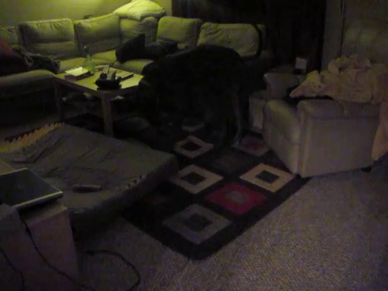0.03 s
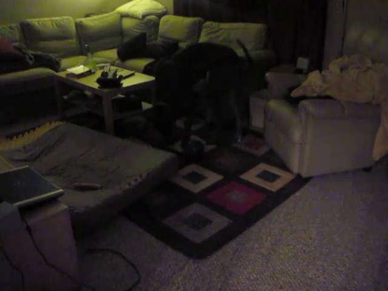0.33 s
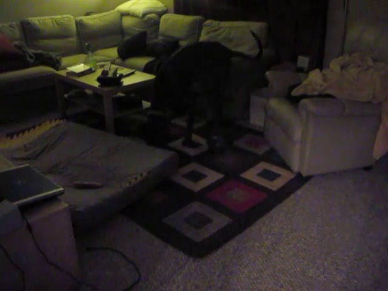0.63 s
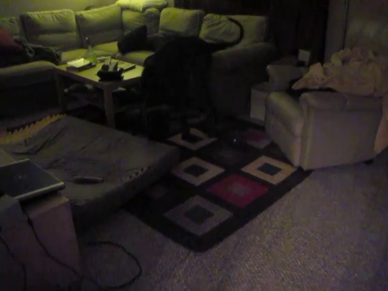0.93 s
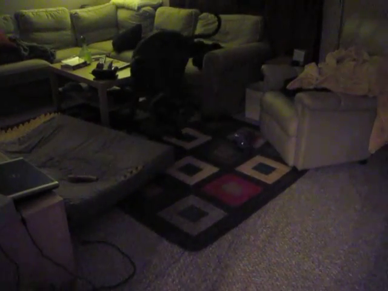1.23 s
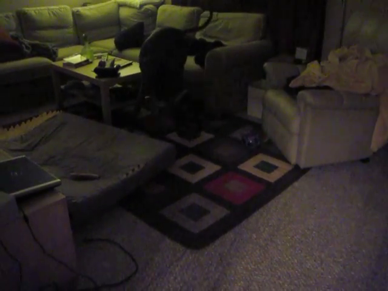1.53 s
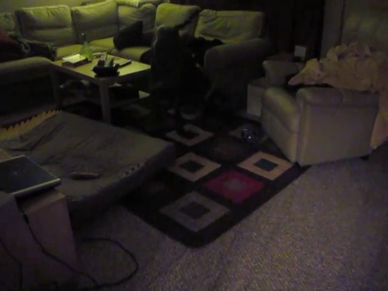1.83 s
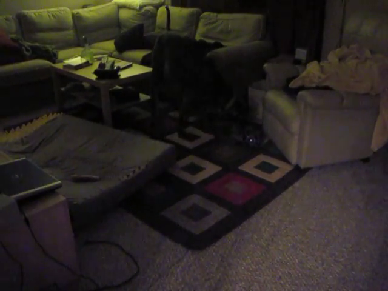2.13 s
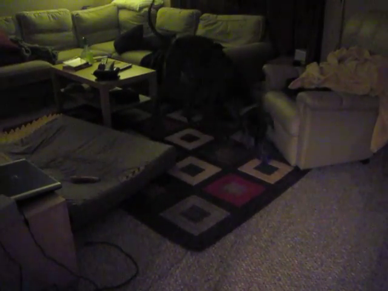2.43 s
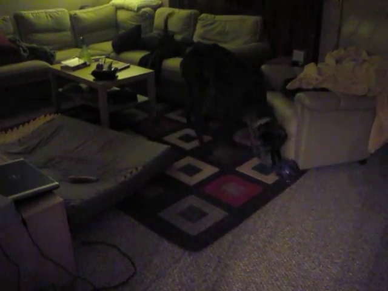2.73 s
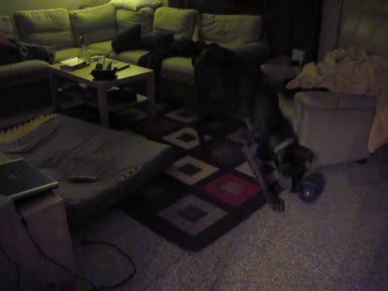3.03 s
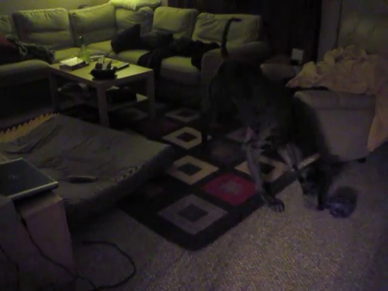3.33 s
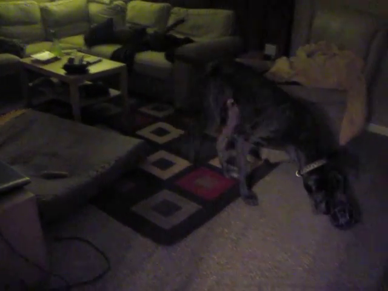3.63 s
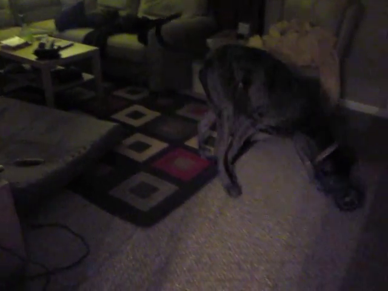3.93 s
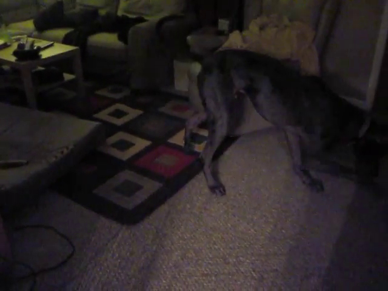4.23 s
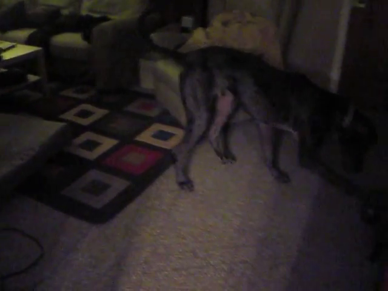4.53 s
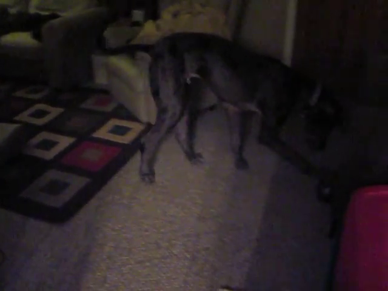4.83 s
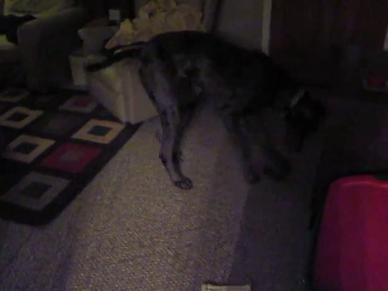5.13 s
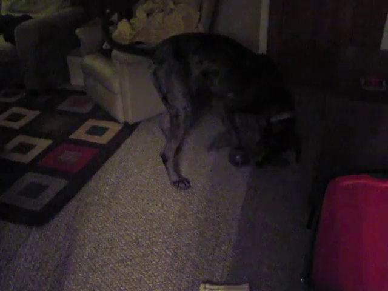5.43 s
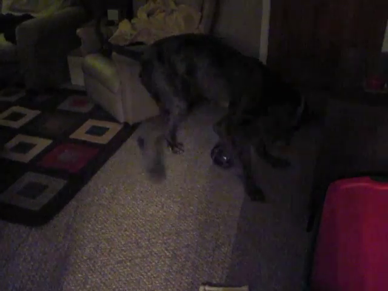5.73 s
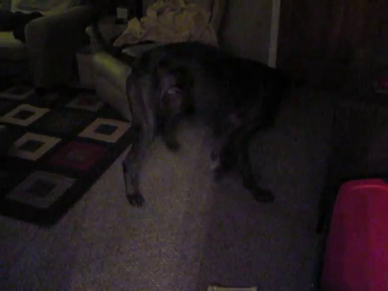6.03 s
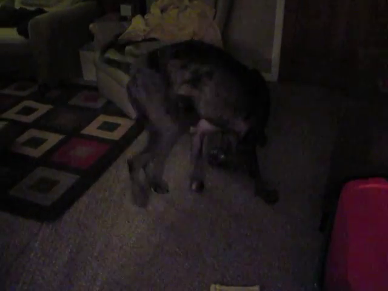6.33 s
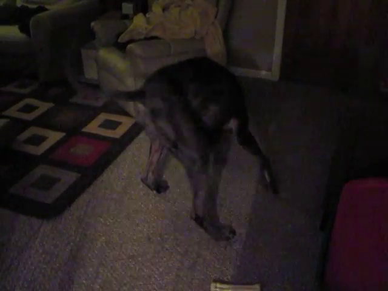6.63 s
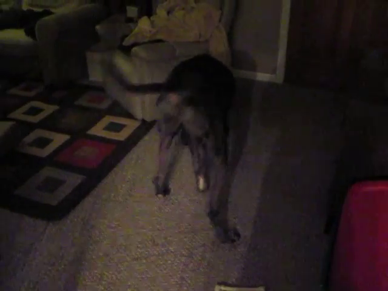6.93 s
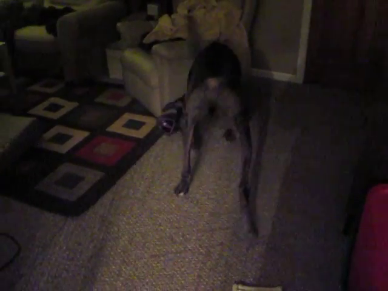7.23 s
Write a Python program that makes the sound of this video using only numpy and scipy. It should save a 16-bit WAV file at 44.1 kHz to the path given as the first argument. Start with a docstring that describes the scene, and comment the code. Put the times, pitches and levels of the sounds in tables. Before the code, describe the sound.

A dog noses a plastic food ball around a room, dry food tumbling inside, teeth clicking on it, and one heavy thump.

```python
"""A carpeted living room, heard from a small camera's microphone a few metres from a dog and its food ball.
The dog noses the hollow plastic ball along: kibble trickles and showers against the ringing shell,
teeth snap on the plastic, and nudges make the air inside hum. Paws, ball and furniture bump and scuff,
with one heavy thump. A short room tail, a low rumble and a faint hiss and whine surround it."""
import sys
import numpy as np
from scipy import signal
from scipy.fft import rfft, irfft
from scipy.io import wavfile
from scipy.ndimage import uniform_filter1d

SR = 44100
rng = np.random.default_rng(int(sys.argv[2]) if len(sys.argv) > 2 else 0)


def bounce(signal):
    """Save signal as a 16-bit WAV file at the path given by the first command-line argument."""
    frames = np.transpose(np.atleast_2d(signal))
    limited = np.clip(frames, -1, 1)
    pcm = np.round(limited * 32767).astype(np.int16)
    wavfile.write(sys.argv[1], SR, pcm)


N = 330750
TIME = np.arange(N) / SR


def undb(db):
    """Decibels to gain."""
    return 10 ** (np.asarray(db) / 20)


def unit(x):
    """Scale to an energy of one."""
    return x / np.sqrt(np.sum(x ** 2))


def add(track, s, x):
    """Mix x into the track from s seconds on."""
    start = max(int(s * SR), 0)
    track[start:start + len(x)] += x[:max(N - start, 0)]


def through(x, impulse):
    """Pass x through an impulse response."""
    return signal.fftconvolve(x, impulse)[:len(x)]


def response(points, size=2048):
    """Causal impulse response of unit energy, shaped by (Hz, dB) points."""
    hz, db = np.transpose(points)
    grid = np.maximum(np.fft.rfftfreq(size, 1 / SR), 1)
    gain = undb(np.interp(np.log(grid), np.log(hz), db))
    cepstrum = irfft(np.log(gain))
    cepstrum[1:size // 2] *= 2  # fold to minimum phase
    cepstrum[size // 2 + 1:] = 0
    return unit(irfft(np.exp(rfft(cepstrum))))


def contacts(count, per_s, spread_db):
    """Random small impacts of uneven size, with an rms of one."""
    hit = rng.random(count) < per_s / SR
    hit[0] = True
    size = undb(spread_db * np.clip(rng.standard_normal(count), -2, 2))
    return unit(hit * size * rng.choice([-1, 1], count)) * np.sqrt(count)


def swells(events, attack_s, release_s):
    """Sum of envelopes that rise, hold and die away, one per (start, length, height)."""
    total = np.zeros(N)
    for s, length, height in events:
        rise = np.clip((TIME - s) / attack_s, 0, 1)
        total += height * rise * np.exp(-np.maximum(TIME - s - length, 0) / release_s)
    return total


def room_tone(hiss_db=-48.5, whine_hz=7840, whine_db=-73.5):
    """Steady room noise and microphone hiss, with a thin electronic whine."""
    # Each row: frequency in Hz, relative level of the hiss in dB.
    hiss_spectrum = [(25, -1.5), (70, -7), (150, -3.5), (400, -4.5), (1000, -7), (2000, -9), (4000, -18.5),
                     (5500, -26), (8000, -27), (12000, -27.5), (16000, -34)]
    hiss = through(rng.standard_normal(N), response(hiss_spectrum, size=8192))
    jittered_hz = whine_hz + 700 * rng.standard_normal(N)
    whine = np.sqrt(2) * np.sin(2 * np.pi * np.cumsum(jittered_hz) / SR)
    return undb(hiss_db) * hiss + undb(whine_db) * whine


def rumble(gain_db=-0.5):
    """Deep noise that grows as the dog comes near and the camera follows it."""
    # Each row: time in seconds, relative level of the rumble in dB.
    levels = [(0.0, -61.5), (3.0, -55.5), (4.6, -60), (5.6, -55.5), (6.6, -49.5), (7.5, -60)]
    # Each row: frequency in Hz, relative level in dB.
    rumble_spectrum = [(20, -9), (38, 7.5), (70, 9), (100, -1.5), (200, -7), (1000, -55)]
    gain = undb(gain_db + np.interp(TIME, *np.transpose(levels)))
    return gain * through(rng.standard_normal(N), response(rumble_spectrum, size=8192))


def room(x, wet_db, low_t60=0.43, mid_t60=0.54, high_t60=0.46, gap_s=0.0016, positions=40):
    """Early reflections thicken into a short tail; the echo pattern changes as the source moves on."""
    t, hop = TIME[:2 ** 14], N // positions
    band = np.digitize(np.fft.rfftfreq(len(t), 1 / SR), [700, 6000])  # low, mid, high
    fades = [undb(-60 * t / t60) * (t > gap_s) for t60 in (low_t60, mid_t60, high_t60)]
    wet = np.zeros(N)
    for start in range(0, N, hop):
        diffuse = rng.standard_normal(len(t))
        early = contacts(len(t), per_s=400, spread_db=4) * np.exp(-t / 0.015)
        echoes = rfft(diffuse + early)
        tail = unit(sum(irfft(echoes * (band == k)) * fade for k, fade in enumerate(fades)))
        first = max(start - hop, 0)
        part = x[first:start + hop]
        crossfade = np.cos(np.pi / 2 * (first + np.arange(len(part)) - start) / hop)
        add(wet, first / SR, signal.fftconvolve(part * crossfade, tail))
    return x + undb(wet_db) * wet


def bumps(scuff_db=-1, width=0.39, rise_share=0.37, floor_hz=70, floor_db=-17):
    """Paws, ball and furniture ring a low, broad resonance and the floor while carpet or cloth scuffs."""
    # Each row: start in seconds, thud level in dB, pitch in Hz, decay in seconds, scuff level in dB.
    soft_blows = [(0.775, -44, 198, 0.038, -46), (1.414, -34.5, 243, 0.069, -37.5),
                  (1.605, -32.5, 249, 0.043, -48), (1.63, -35.5, 117, 0.052, -56),
                  (2.075, -45.5, 433, 0.091, -57), (2.218, -59, 400, 0.014, -39),
                  (2.56, -37.5, 229, 0.061, -41.5), (3.313, -26, 240, 0.052, -28.5),
                  (3.802, -52, 386, 0.0016, -25), (4.278, -19.5, 171, 0.031, -17.5),
                  (4.351, -26.5, 139, 0.019, -21.5), (4.813, -30, 155, 0.028, -40),
                  (5.134, -34, 146, 0.03, -39.5), (5.15, -38, 68, 0.051, -60),
                  (5.211, -32.5, 196, 0.007, -51), (5.314, -34, 193, 0.019, -62),
                  (5.692, -45, 150, 0.027, -46), (5.862, -55, 168, 0.055, -44.5),
                  (6.04, -55, 250, 0.097, -39), (6.19, -45, 127, 0.048, -39.5),
                  (6.621, -48.5, 51.7, 0.092, -49.5), (6.906, -34, 110, 0.019, -50),
                  (7.108, -39.5, 165, .028, -62), (7.224, -42.5, 64.5, 0.024, -61),
                  (7.463, -24, 255, 0.037, -34.5), (7.469, -30, 82, 0.055, -32)]
    # Each row: frequency in Hz, relative level of the scuff in dB.
    scuff_spectrum = [(30, -9), (120, -4.5), (300, -1.5), (600, -1.5), (1200, -4), (2000, -7.5),
                      (4500, -22), (8000, -31), (15000, -34)]
    out, t = np.zeros(N), TIME[:SR // 3]
    for s, db, hz, decay, rub_db in soft_blows:
        rise = rise_share * decay
        push = np.minimum(t / rise, 1) * np.exp(-np.maximum(t - rise, 0) / decay)
        force, friction = rng.standard_normal((2, len(t))) * push
        size = np.linalg.norm(push)
        for ring_hz, ring_db in ((hz, 0), (floor_hz, floor_db)):
            edges_hz = [ring_hz / (1 + width), ring_hz * (1 + width)]
            band = signal.butter(2, edges_hz, "band", fs=SR, output="sos")
            # a resonance takes half a cycle to start, so the push comes that much early
            add(out, s - .5 / ring_hz, size * undb(db + ring_db) * unit(signal.sosfilt(band, force)))
        scuff = unit(through(friction, response(scuff_spectrum)))
        add(out, s, size * undb(rub_db + scuff_db) * scuff)
    return out


def collision(s=4.2745, hz=190, swell_s=0.0032, peak_db=-9):
    """The ball runs into something solid: one heavy thump of a few cycles."""
    out, t = np.zeros(N), TIME[:SR // 10]
    envelope = t / swell_s * np.exp(1 - t / swell_s)
    add(out, s, undb(peak_db) * np.sin(2 * np.pi * hz * t) * envelope)
    return out


def cavity_hum(hz=335, push_s=0.027, ring_s=0.0058, gain_db=27):
    """An uneven push makes the air in the hollow ball ring at one low note."""
    # Each row: time of the nudge in seconds, relative level in dB.
    nudges = [(5.756, -41), (5.931, -37.5), (6.046, -40), (6.126, -37), (6.174, -29.5), (6.204, -38)]
    out, t = np.zeros(N), TIME[:SR // 4]
    note = np.sin(2 * np.pi * hz * t) * np.exp(-t / ring_s) * t
    for s, db in nudges:
        push = rng.standard_normal(len(t)) * np.exp(-t / push_s)
        add(out, s - ring_s, unit(through(push, note)) * undb(db + gain_db))
    return out


def disperse(x, hz=3100, width_hz=1300, stages=2):
    """Bending waves travel at unequal speeds, which spreads each click over a millisecond."""
    _, poles = signal.iirpeak(hz, hz / width_hz, fs=SR)
    for _ in range(stages):
        x = signal.lfilter(poles[::-1], poles, x)  # all-pass
    return x


def knock(hz):
    """The short, broad ring of the plastic around a spot whose pitch is hz."""
    # Each row: multiple of the pitch, relative level in dB.
    spot_spectrum = [(.1, -30.5), (.35, -18), (.6, -5.5), (.8, 1), (1, 2), (1.25, -5.5), (1.7, -16.5),
                     (4, -31.5)]
    return response([(hz * k, db) for k, db in spot_spectrum])


def shell(blows, ring_db, free_t60=0.13, grip_ease_s=0.09):
    """Each blow clicks and rings the shell; it lands on a new spot, so each mode takes a random share."""
    # The muzzle's grip damps or frees the ring. Each row: start and length in seconds, change in dB
    # for a mode whose t60 is free_t60.
    grips = [(3.45, .3, 1.5), (4.32, 0.33, -14), (5.85, 0.4, -8)]
    # Each row: frequency of a mode in Hz, relative level in dB, seconds to fall 60 dB.
    modes = [(967, -18, 0.15), (1045, -11.5, 0.05), (1196, -17, 0.054), (1758, -5.5, 0.072),
             (1820, -7, 0.091), (1920, -14, 0.2), (2187, -17, 0.12), (2480, -6, 0.071), (2676, -3.5, 0.049),
             (2660, -25, 0.091), (3260, -22, 0.053), (3765, -10, 0.028)]
    # Each row: frequency in Hz, relative level of the click in dB.
    click_spectrum = [(300, -15), (800, -32), (1500, -5), (1900, 5), (2700, 14.5), (3500, 6), (4600, 3),
                      (5600, -7), (7500, -53), (15000, -79)]
    t = TIME[:SR // 3]
    grip_db = swells(grips, grip_ease_s, grip_ease_s / 2)
    out = through(blows, response(click_spectrum))
    for hz, db, t60 in modes:
        mode = unit(np.sin(2 * np.pi * hz * t) * undb(-60 * t / t60))
        # a touch matters most to the modes that ring longest
        share = undb(ring_db + db + grip_db * t60 / free_t60) * rng.standard_normal(N)
        out += through(blows * share, mode)
    return out


def drops(hz=1772, t60=0.17, ring_db=19, click_hz=2400, click_db=15, contact_s=0.0051):
    """A lone piece clacks on the free wall of the ball, which rings on at one clear note."""
    # Each row: start in seconds, relative level in dB.
    lone_pieces = [(0.8176, -40), (1.015, -37.5), (3.269, -28), (4.2108, -28), (5.4295, -22), (5.627, -15),
                   (5.7133, -26.5), (6.392, -25.5)]
    out, t = np.zeros(N), TIME[:SR // 4]
    ring = unit(np.sin(2 * np.pi * hz * t) * undb(-60 * t / t60))
    for s, db in lone_pieces:
        force = contacts(len(t), per_s=6000, spread_db=6) * np.exp(-t / contact_s)
        click = unit(through(force, knock(click_hz)))
        add(out, s, undb(db) * (undb(ring_db) * ring + undb(click_db) * click))
    return out


def snaps(body_db=20, edge_db=12, edge_ring_s=0.0046, edge_hz=3930, db_per_octave=24.5, first_touch=10):
    """Teeth, claws and hard pieces click on the plastic: a brief contact snaps, a longer one crunches."""
    # Each row: start in seconds, relative level in dB, pitch in Hz, contact time in seconds.
    strikes = [(0.457, -29, 3300, 0.005), (0.818, -31.5, 2970, 0.006), (2.306, -37, 2570, 0.0058),
               (2.406, -32.5, 2600, 0.0052), (2.752, -27, 2900, 0.001), (2.786, -31, 4200, 0.013),
               (2.942, -31, 3830, 0.006), (3.061, -20.5, 3030, 0.0038), (3.27, -23.5, 2320, 0.008),
               (3.327, -23.5, 4170, 0.038), (3.456, -22.5, 4400, .003), (3.686, -28.5, 2470, 0.0047),
               (3.791, -20.5, 3160, 0.0031), (3.802, -11.5, 3800, 0.00066), (4.127, -25.5, 3730, 0.012),
               (4.284, -15, 1160, 0.0037), (4.299, -15.5, 3320, 0.0014), (4.357, -15, 2630, 0.00013),
               (4.82, -30.5, 2250, 0.004), (4.989, -37.5, 4400, 0.06), (5.081, -33.5, 3830, 0.0029),
               (5.109, -17.5, 3800, 0.00063), (5.210, -20.5, 2600, 0.0023), (5.209, -24.5, 1220, 0.0032),
               (5.268, -13.5, 3280, 0.0075), (5.354, -17, 3830, 0.03), (5.529, -13, 3460, 0.00032),
               (5.991, -23.5, 3340, 0.017), (6.070, -21.5, 3820, 0.028), (6.191, -17, 3820, 0.03),
               (6.577, -23.5, 2550, 0.013), (6.65, -27, 3900, 0.008), (6.748, -26.5, 2590, 0.004),
               (7.385, -33.5, 3800, 0.011)]
    # Each row: frequency in Hz, relative level of the bright edge in dB.
    edge_spectrum = [(2000, -30), (4500, -6), (7500, -1), (11500, 0), (13500, -3), (15500, -9)]
    out, t = np.zeros(N), TIME[:SR // 10]
    soften = signal.butter(3, 13500, fs=SR, output="sos")
    for s, db, hz, contact_s in strikes:
        force = contacts(len(t), per_s=3400, spread_db=6) * np.exp(-t / contact_s)
        grit = rng.standard_normal(len(t)) * np.exp(-t / (contact_s + edge_ring_s))
        grit[0] += first_touch  # one clean click leads
        edge = unit(signal.sosfilt(soften, through(grit, response(edge_spectrum))))
        # harder contacts sound higher and carry more treble
        hardness_db = db_per_octave * np.log2(hz / edge_hz)
        add(out, s, unit(through(force, knock(hz))) * undb(db + body_db))
        add(out, s, edge * undb(db + hardness_db + edge_db))
    return out


def tumbling(slips_per_s=24, spread_db=1.5):
    """The heap slips in small uneven clumps: a gain near one that jumps with each slip."""
    hold = int(SR / slips_per_s)
    slips = np.repeat(rng.standard_normal(1000), hold)[:N]
    return undb(spread_db * uniform_filter1d(slips, hold // 3))


def kibble(trickle_db=-4, trickle_tick_db=-27, shower_db=-10.5, shower_tick_db=-30, gather_s=0.00053,
           spot_hz=2770, spot_db=-13, spot_spread=0.014):
    """Pieces trickle over the wall and at times fall together on one spot; the hardest edges also tick."""
    # Pushes set the ball rolling. Each row: start and length in seconds, relative level in dB.
    rolls = [(-0.05, 0.43, -42), (0.466, 0.18, -40), (0.705, 0.25, -46.5), (1.28, 0.14, -47.5),
             (1.384, 0.17, -45), (2.239, 0.29, -44), (2.55, 0.83, -35.5), (3.3, 0.39, -34.5),
             (4.068, 0.27, -30.5), (4.42, 0.25, -47), (5.303, 0.4, -34.5), (5.75, 0.52, -40),
             (6.38, 0.82, -41), (7.025, .22, -37.5), (7.272, 0.24, -38.5)]
    # Showers hit the shell. Each row: start in seconds, relative level in dB, decay in seconds.
    showers = [(0.11, -28, 0.061), (0.205, -26.5, 0.11), (0.2544, -22.5, 0.044), (0.5398, -29.5, 0.042),
               (0.935, -33.5, 0.027), (2.4875, -25.5, 0.0076), (2.5453, -17, 0.0092), (2.5554, -13, 0.01),
               (2.62, -19, 0.014), (2.6571, -17, 0.019), (2.737, -11.5, 0.011), (2.835, -17.5, 0.017),
               (2.8871, -14, 0.0066), (2.9913, -24.5, 0.032), (3.049, -15, 0.019), (3.1353, -21, 0.013),
               (3.456, -10.5, 0.0053), (3.4815, -13.5, 0.016), (3.5744, -15, 0.014), (3.683, -16.5, 0.017),
               (3.975, -30.5, 0.12), (4.1041, -20, 0.021), (4.127, -19.5, 0.012), (4.2095, -18.5, 0.012),
               (4.2354, -11, 0.0062), (4.3841, -15, 0.012), (4.4306, -21.5, 0.038), (5.2679, -8.5, 0.017),
               (5.3011, -18.5, 0.023), (5.3415, -13.5, 0.032), (5.3543, -14.5, 0.012), (5.378, -15.5, 0.03),
               (5.4297, -13, 0.0061), (5.5281, -15, 0.012), (5.5784, -17, 0.084), (6.4548, -22.5, 0.0058),
               (6.6139, -26, 0.092), (6.6498, -18.5, 0.041), (6.746, -17, 0.014), (6.8301, -23, 0.046),
               (6.8862, -16, 0.0059), (7.0348, -19, 0.023), (7.059, -14, 0.0075), (7.1105, -11, 0.0063),
               (7.1417, -13, 0.017), (7.258, -18.5, 0.03), (7.478, -30, 0.015)]
    # Each row: frequency in Hz, relative level of the tick in dB.
    tick_spectrum = [(2000, -20), (4500, -42), (7500, 4), (10500, 6.5), (15500, -34)]
    rolling = swells([(s, length, undb(db)) for s, length, db in rolls], attack_s=0.045, release_s=0.066)
    trickle = contacts(N, per_s=750, spread_db=2) * rolling * tumbling()
    blows, ticks = trickle * undb(trickle_db), trickle * undb(trickle_tick_db)
    spots, t = np.zeros(N), TIME[:SR // 6]
    for s, db, decay in showers:
        # the first pieces lead, the bulk lands just behind them and then settles
        heap = (1 - np.exp(-t / gather_s)) * np.exp(-t / decay)
        fall = unit(contacts(len(t), per_s=1700, spread_db=3.5) * heap) * np.sqrt(decay * SR / 2)
        hz = spot_hz * np.exp(spot_spread * rng.standard_normal())
        add(blows, s, fall * undb(db + shower_db))
        add(spots, s, through(fall * rng.choice([-1, 1], len(t)), knock(hz)) * undb(db + spot_db))
        add(ticks, s, fall * undb(db + shower_tick_db))
    return shell(blows, ring_db=-5.5) + spots + through(ticks, response(tick_spectrum))


def scene(dull_hz=13000):
    """Ball and dog a few metres off in the room; the soft furnishings take the top off both."""
    dull = signal.butter(3, dull_hz, fs=SR, output="sos")
    rattle = signal.sosfilt(dull, disperse(kibble() + snaps() + drops()))
    thuds = signal.sosfilt(dull, bumps() + collision() + cavity_hum())
    return (room(rattle, wet_db=-2.0) + room(thuds, wet_db=-3.5) + rumble() + room_tone())[None]


def record(dry, notch_hz=6310, notch_width_hz=1700, top_hz=15800):
    """The camera has a deep notch in the treble and cuts the top."""
    notched = signal.lfilter(*signal.iirnotch(notch_hz, notch_hz / notch_width_hz, fs=SR), dry)
    return signal.sosfilt(signal.ellip(12, .2, 90, top_hz, fs=SR, output="sos"), notched)


dry = scene()
out = record(dry)
bounce(out)
```